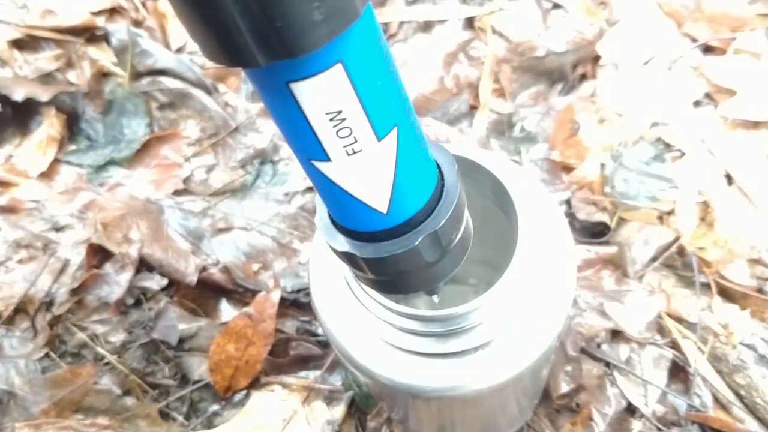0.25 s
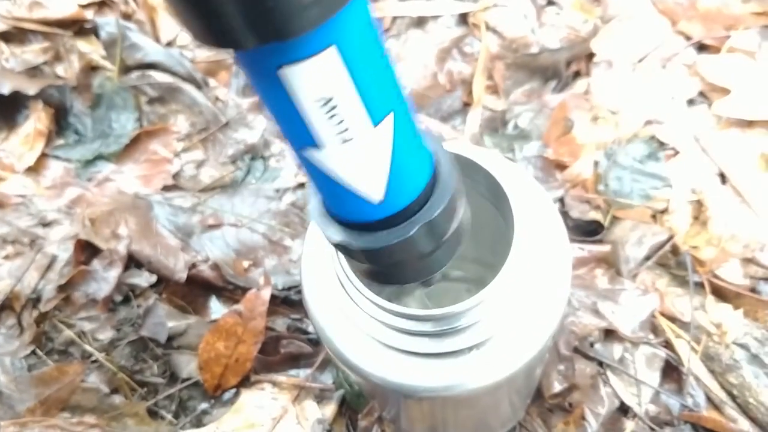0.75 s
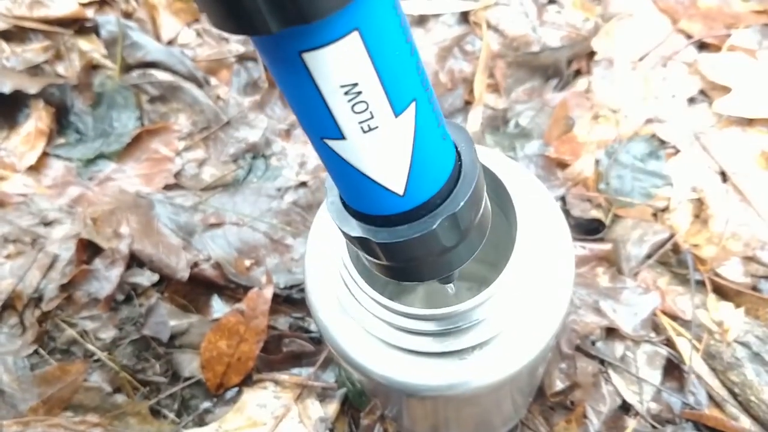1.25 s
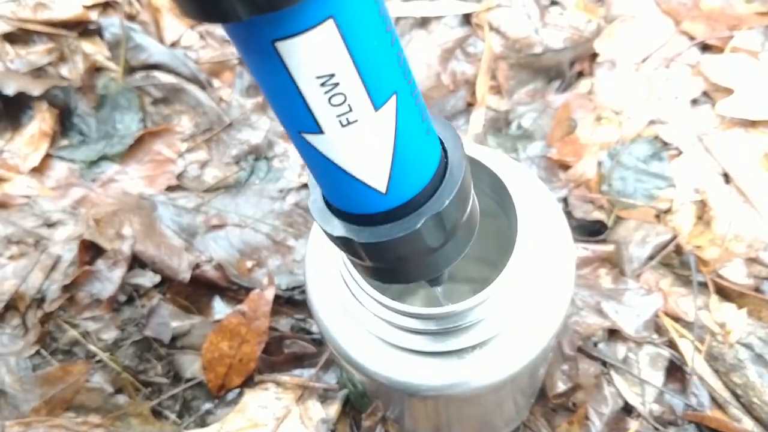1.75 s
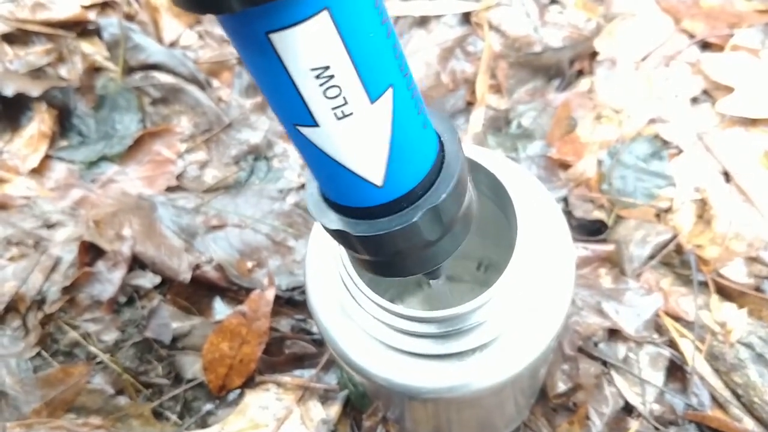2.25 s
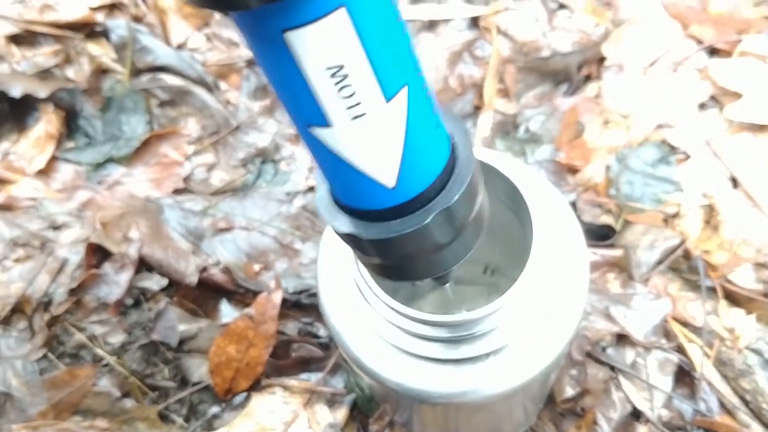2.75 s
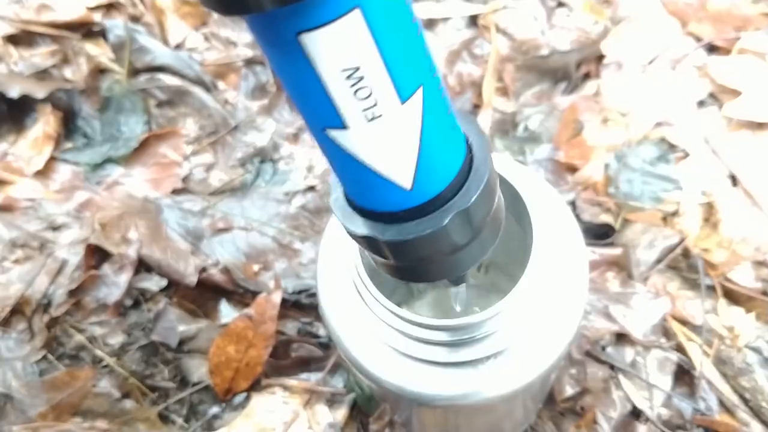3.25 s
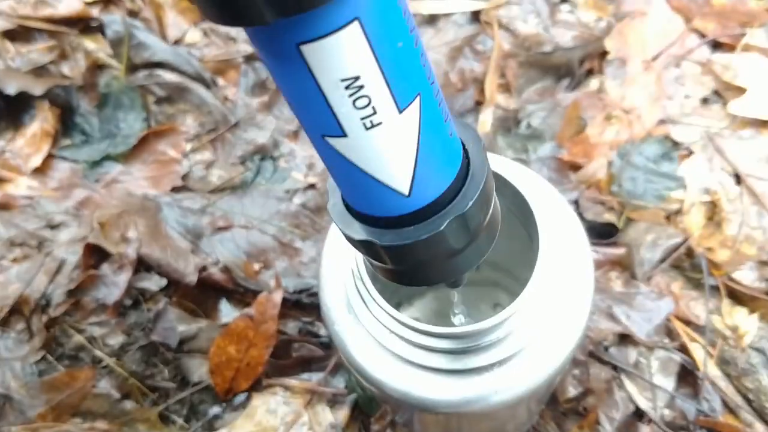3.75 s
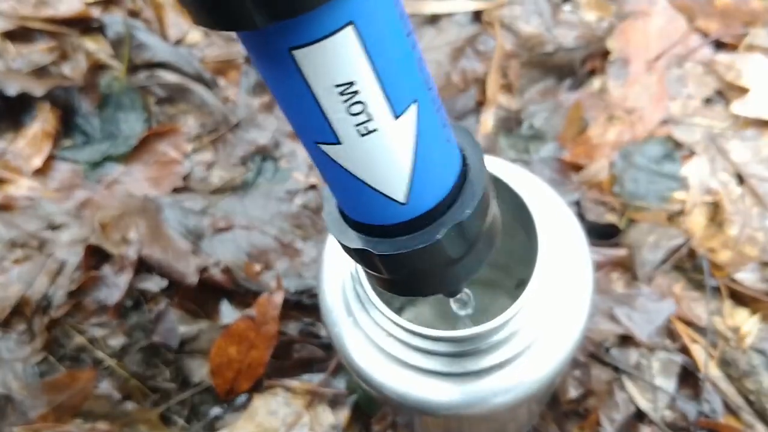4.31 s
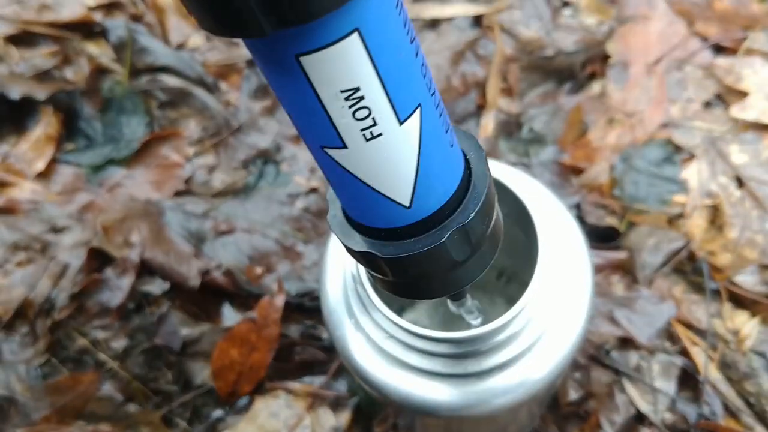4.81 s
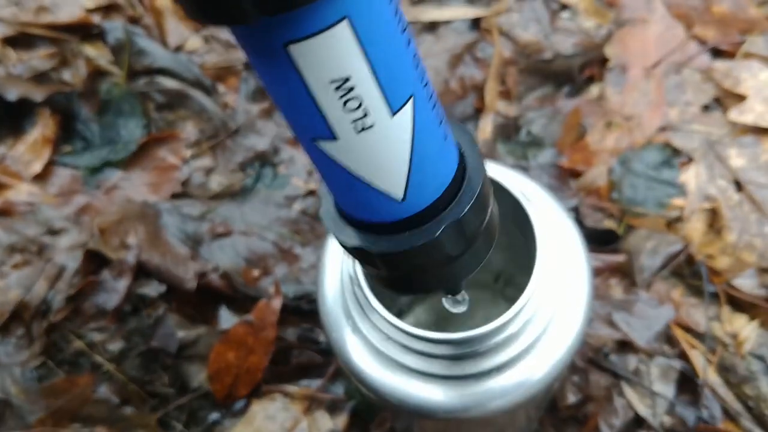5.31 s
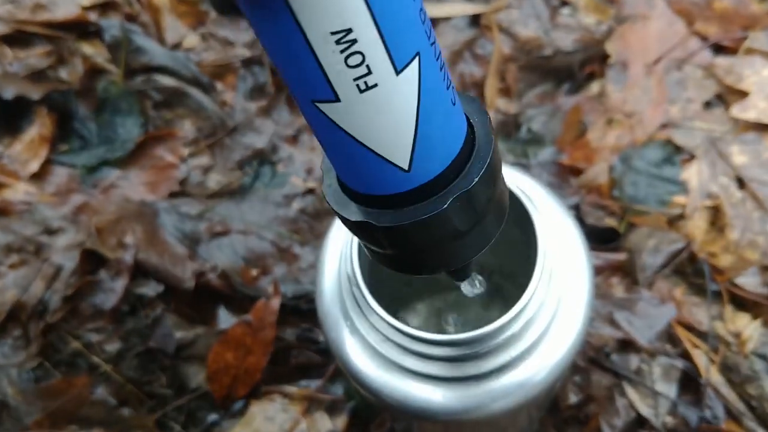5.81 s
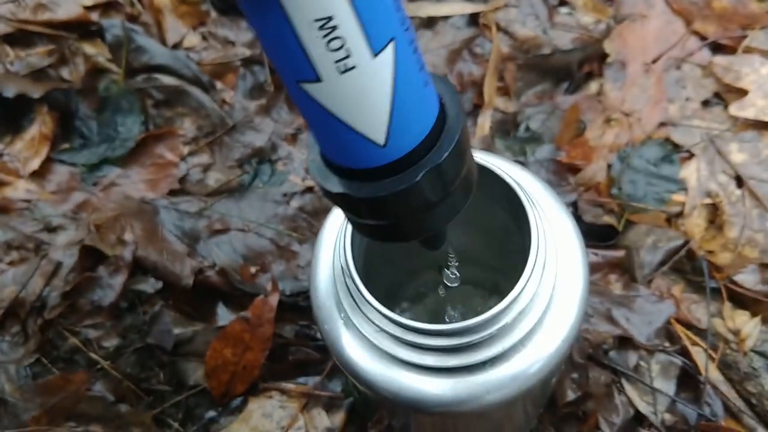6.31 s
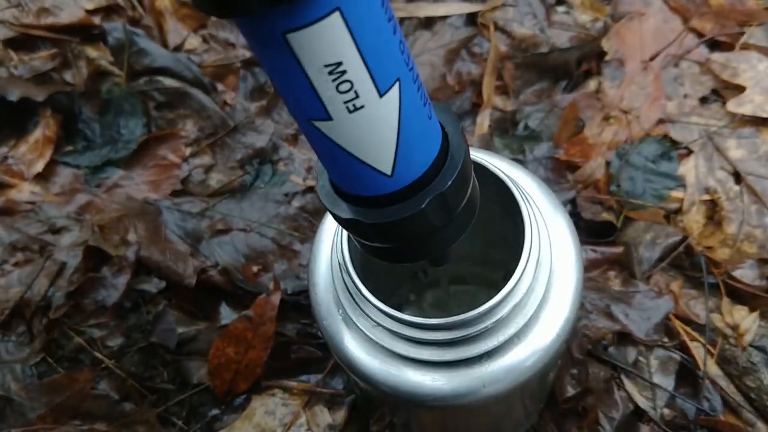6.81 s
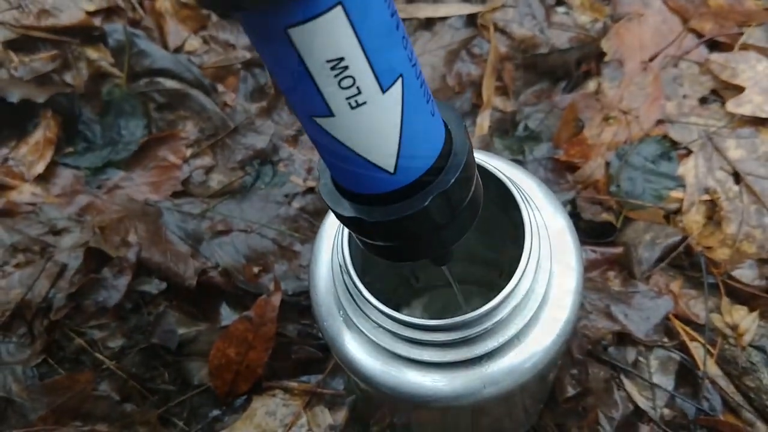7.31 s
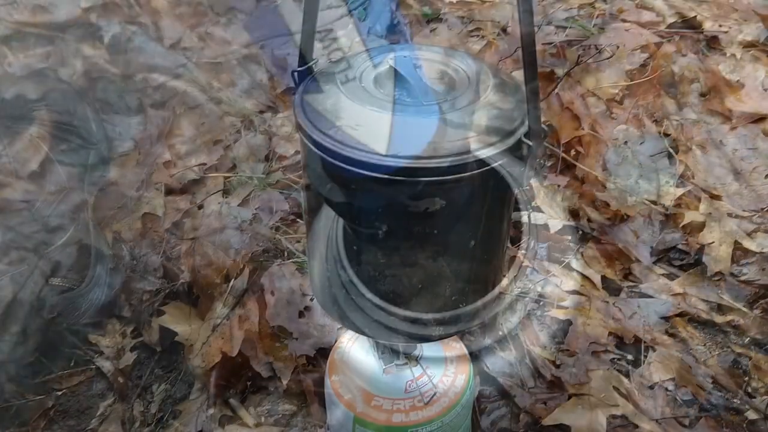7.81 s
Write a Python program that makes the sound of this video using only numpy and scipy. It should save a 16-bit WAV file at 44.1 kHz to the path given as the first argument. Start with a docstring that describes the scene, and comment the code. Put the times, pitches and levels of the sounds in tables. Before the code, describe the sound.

Irregular drops tick and spit brightly inside a metal bottle, gurgling and plinking, with the bottle's air humming low beneath. A dull distant rush surrounds it. The busy dripping calms for about two seconds, then returns. Near the end come a soft handling thump, a very short gap, and a louder low flame roar, heard close on a phone.

```python
"""Water trickling into a steel bottle, then a stove

Water trickles from a hand-held filter into a steel bottle over a broad outdoor roar. Drops splat as
filtered noise bursts, ring the bottle's air and wall as resonances and trap gliding bubble tones.
After a short silence a gas stove roars close by, as coloured noise like the outdoor roar. A phone
ducks its gain after sharp splats and widens its two microphone ports into stereo."""
import sys
import numpy as np
from scipy import signal
from scipy.fft import rfft, irfft, next_fast_len
from scipy.io import wavfile
from scipy.ndimage import uniform_filter1d

SR = 44100
rng = np.random.default_rng(int(sys.argv[2]) if len(sys.argv) > 2 else 0)


def dump(signal):
    """Clip the signal to [-1, 1] and save it as 16-bit WAV at the path in sys.argv[1]."""
    limited = np.clip(np.atleast_2d(signal).T, -1, 1)
    pcm = np.round(limited * 32767).astype(np.int16)
    wavfile.write(sys.argv[1], SR, pcm)


N = 355446
LONG = next_fast_len(N + 10)  # length of the spectra in samples

# surges of the water: top_s, hum_peak_db, air_column_pitch_hz
GUSHES = [(0.158, -31.5, 330), (0.212, -31, 309), (0.299, -27, 325.5), (0.408, -35, 311),
          (0.46, -34.5, 326), (0.597, -37.5, 311), (0.638, -36.5, 303), (0.708, -33, 316),
          (0.809, -35.5, 313), (0.852, -33, 322), (0.918, -37.5, 311), (0.974, -35.5, 333),
          (1.066, -34.5, 305), (1.103, -35, 318), (1.213, -33, 300), (1.419, -34.5, 307), (1.459, -35, 308),
          (1.946, -34.5, 321), (1.981, -34, 324), (2.132, -40, 327), (2.35, -36, 328), (2.431, -37, 310),
          (2.556, -35, 325), (2.61, -40, 340), (2.645, -31.5, 324), (2.81, -35, 310), (2.841, -35, 313),
          (2.972, -34, 302), (3.03, -40, 329), (3.06, -37.5, 316), (3.476, -35, 317), (3.527, -32, 323),
          (3.632, -31.5, 325), (4.154, -33, 296), (6.431, -32, 305), (6.473, -39, 309), (6.608, -39.5, 330),
          (6.674, -34, 323), (6.785, -42, 328), (6.828, -43, 314), (7.16, -34.5, 319), (7.401, -41, 322),
          (7.475, -37.5, 313), (7.514, -37.5, 329), (7.582, -43, 325)]
GUSH_RISE_DB_S, GUSH_FALL_DB_S = 602, 419
# gap between the water and the stove: start_s, end_s
SILENCE = (7.818, 7.871)


def undb(db):
    """Decibels to amplitude."""
    return 10 ** (np.asarray(db) / 20)


def curve(rows):
    """Second column of a table against time."""
    return np.interp(np.arange(N) / SR, *np.transpose(rows)[:2])


def across(rows, hz):
    """Second column of a table against log frequency."""
    table_hz, values = np.transpose(rows)
    return np.interp(np.log(hz + 1), np.log(table_hz), values)


def unit(x):
    """Scale to an RMS of 1."""
    return x / np.sqrt(np.mean(x ** 2))


def ring(x, hz, width):
    """One resonance, gain 1 at its centre."""
    return signal.lfilter(*signal.iirpeak(hz, hz / width, SR), x)


def walk(rate):
    """Random levels held 1 / rate s and slewed twice; spread near 1."""
    hold = int(SR / rate)
    steps = np.repeat(rng.standard_normal(N // hold + 1), hold)
    return 1.52 * uniform_filter1d(uniform_filter1d(steps, hold), hold)[:N]


def add(out, s, sound):
    """Mix a short sound in at time s."""
    i = int(s * SR)
    out[i:i + len(sound)] += sound[:N - i]


def splat(db, hz, width, tail_db):
    """A sub-millisecond crack, its echo from the bottle floor, a low slap, a hiss of spray and a thin fizz."""
    slap_hz, slap_db, slap_decay_s = 3300, -23.5, 0.0011  # mean level against the crack
    spray_decay_s, fizz_decay_s, fizz_db = 0.0067, 0.0085, -5.5  # fizz level against the spray
    t = np.arange(1800) / SR
    width = max(width, 300)
    noise = rng.standard_normal((4, len(t)))
    crack = (t == 0) + .45 * noise[0] * np.exp(-t / .00025)
    crack = crack + .4 * np.roll(crack, int(.0013 * SR))  # floor echo
    edge = width / 60000 * np.diff(crack, prepend=0)  # broad bright onset
    crack = ring(ring(crack, hz, 1.71 * width), hz, 2.17 * width) + edge
    slap_gain = undb(slap_db + 1.8 * noise[3, 0])  # varies from drop to drop
    slap = unit(ring(noise[3], slap_hz, 2200)) * np.exp(-t / slap_decay_s) * slap_gain
    spray = unit(ring(ring(noise[1], hz, width), hz, 0.56 * width)) * np.exp(-t / spray_decay_s)
    fizz = unit(ring(noise[2], hz * rng.uniform(.85, 1.1), 150)) * np.exp(-t / fizz_decay_s)
    burst = crack / abs(crack).max() + slap + undb(tail_db) * (spray + undb(fizz_db) * fizz)
    return undb(db) * burst / abs(burst).max()


def splats():
    """Loud drops burst on the surface over a random patter of faint ones."""
    # loud drops: start_s, peak_db, centre_hz, width_hz
    loud_drops = [(0.0837, -18.5, 8700, 5740), (0.086, -32, 7240, 6100), (0.1487, -28, 10100, 2700),
                  (0.1752, -34, 10700, 1800), (0.203, -36, 10000, 4600), (0.2507, -19.5, 10000, 3500),
                  (0.371, -27, 10200, 3030), (0.3934, -26, 9800, 4250), (0.435, -29.5, 10600, 2510),
                  (0.715, -23, 10800, 3500), (0.7679, -39, 10000, 3400), (0.842, -26.5, 9800, 4300),
                  (0.849, -25.5, 11200, 4050), (0.9834, -30, 10800, 2260), (1.087, -25, 7760, 1300),
                  (1.096, -30, 7400, 2500), (1.128, -28, 11000, 3400), (1.142, -19.5, 12300, 4500),
                  (1.1984, -20, 9600, 3650), (1.2131, -30, 9900, 3700), (1.286, -24, 9150, 2170),
                  (1.3376, -32, 11600, 3800), (1.3717, -28, 10600, 4700), (1.3832, -27, 8000, 4000),
                  (1.4386, -25, 10900, 2100), (1.48, -32, 10700, 4230), (1.493, -38, 10600, 3700),
                  (1.581, -18.5, 10300, 2400), (1.605, -18.5, 10800, 2200), (1.638, -25.5, 8700, 2700),
                  (1.842, -33, 10600, 3200), (1.9845, -37, 8700, 4700), (2.005, -31, 9200, 3900),
                  (2.035, -21.5, 10600, 1770), (2.048, -25, 10200, 3700), (2.0611, -39, 10500, 4500),
                  (2.199, -20, 11900, 1960), (2.319, -25, 10500, 2300), (2.4072, -30, 9200, 2800),
                  (2.4452, -27, 8600, 4660), (2.5269, -29, 10800, 2200), (2.538, -38, 8050, 2500),
                  (2.587, -33, 9900, 3900), (2.618, -37, 8200, 2500), (2.606, -22.5, 11300, 1310),
                  (2.65, -24, 10370, 1800), (2.6575, -20.5, 10000, 1500), (2.714, -22.5, 10660, 2900),
                  (2.7751, -33.5, 11400, 3700), (2.9065, -30, 12800, 4130), (2.939, -25, 8150, 1110),
                  (3.0252, -24, 10600, 2500), (3.126, -31, 9500, 3700), (3.153, -26.5, 9200, 4000),
                  (3.159, -21, 10100, 4300), (3.2433, -30, 10100, 2600), (3.281, -34, 10200, 4900),
                  (3.325, -20, 8600, 1970), (3.342, -20.5, 10200, 3530), (3.4398, -30, 11200, 3900),
                  (3.464, -31.5, 7400, 4480), (3.499, -35, 9400, 2080), (3.7038, -21, 8900, 2860),
                  (3.81, -19, 11100, 2400), (3.826, -17, 10400, 1540), (3.73, -44, 10000, 4000),
                  (3.768, -51, 9000, 1500), (3.889, -35, 10100, 5000), (3.986, -31, 9800, 5100),
                  (4.095, -18.5, 8650, 3300), (4.4471, -36.5, 8700, 2500), (5.2496, -40, 8700, 2500),
                  (5.495, -32.5, 8700, 3400), (6.432, -26, 8900, 2400), (6.481, -25, 8040, 3000),
                  (6.6128, -32, 9800, 4500), (6.651, -33, 9500, 4600), (6.8174, -31, 8400, 1800),
                  (6.824, -23.5, 13100, 3420), (6.92, -41, 8960, 2500), (6.963, -19.5, 11160, 2160),
                  (7.0318, -27.5, 9900, 2600), (7.061, -15.5, 10800, 1490), (7.1455, -28.5, 9050, 5000),
                  (7.1985, -28, 9660, 3100), (7.082, -27, 9100, 6000), (7.2506, -35.5, 8600, 3000),
                  (7.266, -36, 11000, 2500), (7.301, -35, 9100, 2500), (7.3823, -33, 10800, 3500),
                  (7.41, -32, 12900, 3195), (7.4446, -35, 9000, 3000), (7.496, -39, 8100, 1500),
                  (7.5744, -34, 8400, 4300), (7.7315, -37, 10650, 3000), (7.739, -37, 7000, 4000),
                  (7.7884, -39, 10300, 2700)]
    # density of the faint drops: time_s, drops_per_s
    patter_rate = [(0, 110), (3.9, 110), (4.3, 25), (6.3, 25), (6.5, 70), (7.8, 70)]
    # spray against the crack of a -25 dB splat; louder splats carry relatively less (dB per dB)
    spray_db, spray_slope = -14.5, 0.43
    patter_db = -45  # before the random spread in drop size
    out = np.zeros(N)
    for s, db, hz, width in loud_drops:
        add(out, s, splat(db, hz, width, spray_db - spray_slope * (db + 25)))
    for i in np.flatnonzero(rng.random(N) < curve(patter_rate) / SR):
        size, colour, width = rng.random(3)
        db = patter_db - 2.9 * np.log(size + 0.056)
        add(out, i / SR, splat(db, 6000 + 7500 * colour, 1500 + 4500 * width, -19))
    return out


def knocks():
    """A drop shakes the wall for a few ms; its modes swell, waver and fade."""
    # drops that ring the wall: time_s (the swell begins 2 ms earlier), level_db, push_ms
    wall_hits = [(0.0425, -34, 2.6), (0.204, -28, 2.3), (0.2498, -35, 3), (0.291, -37.5, 4.5),
                 (0.4663, -23.5, 4.8), (0.547, -39, 7), (0.5938, -25.5, 4.2), (0.624, -30.5, 3.2),
                 (0.697, -35, 4.6), (0.812, -37, 4.5), (0.844, -23.5, 4.2), (0.959, -32, 7.2),
                 (1.016, -38, 6), (1.0972, -29.5, 5.2), (1.133, -35, 5), (1.415, -24, 3.3),
                 (1.4544, -24, 5.1), (1.5076, -24.5, 6.1), (1.539, -35, 6.8), (1.983, -32, 2.6),
                 (2.34, -31.5, 4.7), (2.372, -30, 2.9), (2.41, -35, 4.1), (2.5413, -36, 6), (2.616, -37, 5),
                 (2.794, -17.5, 10), (2.9706, -32, 6.5), (3.078, -41, 5), (3.127, -43, 5),
                 (3.316, -36, 5.1), (3.394, -21.5, 20), (3.434, -32, 6.7), (3.617, -40, 5), (3.686, -38, 4),
                 (3.788, -43, 3.4), (6.42, -36, 6), (6.67, -42, 6), (7.2697, -28.5, 14), (7.6202, -21, 20)]
    # modes of the steel wall: pitch_hz, level_db, t60_s
    wall_modes = [(1312, 0, .1), (1385, -12, .05), (780, -16, .05)]
    out, t = np.zeros(N), np.arange(6000) / SR
    for s, db, push_ms in wall_hits:
        waver = 1 + 0.31 * np.sin(2 * np.pi * (rng.uniform(69, 96) * t + rng.random()))
        swell = 1 - np.exp(-(t * 1300 / max(push_ms, .3)) ** 1.55)
        modes = 0
        for hz, mode_db, t60 in wall_modes:
            tone = np.sin(2 * np.pi * (hz * t + rng.random()))
            modes = modes + undb(mode_db - 60 * t / t60) * tone
        add(out, s - .002, undb(db) * swell * waver * modes)
    return out


def bubble(db, hz, t60, glide):
    """A rough little splash, then a ragged tone that fades and glides as the bubble nears the surface."""
    t = np.arange(int(t60 * SR)) / SR
    noise = rng.standard_normal((2, len(t)))
    fade = undb(-60 * (t / t60) ** 1.35) * (1 - np.exp(-t / .001))
    splash = unit(ring(noise[0], 1.29 * hz, 0.56 * hz)) * np.exp(-t * hz / 11)
    pure = np.sin(2 * np.pi * hz * (t + glide * t ** 2 / t60))
    ragged = 0.23 * min(hz / 3000, 1) * unit(ring(noise[1], hz, 0.083 * hz))
    return undb(db) * (fade * (pure + ragged) + 0.3 * splash)


def bubbles():
    """The clear bubbles, each trailed by a swarm of smaller ones, over a gurgle of faint ones."""
    # clear bubbles: start_s, level_db, pitch_hz, glide (share of pitch gained by half of the t60)
    clear_bubbles = [(0.085, -32, 6000, -0.1), (0.248, -34, 2110, -0.053), (0.468, -31.5, 2760, 1.2),
                     (0.582, -48.5, 2320, 0), (0.524, -43.5, 3480, 0.47), (0.826, -41, 2940, 0.3),
                     (0.851, -45, 3400, 0.52), (1.103, -40, 2900, 0.1), (1.106, -45, 1850, -0.017),
                     (1.964, -36, 927, 0.26), (1.383, -42.5, 3100, 0.16), (2.004, -39, 2880, 0.31),
                     (2.272, -37.5, 2990, 0.34), (2.365, -43, 750, 0.47), (2.416, -34, 2470, 0.38),
                     (2.493, -35.5, 796, 0.68), (2.543, -39, 948, 0.019), (2.586, -51, 3840, 0.17),
                     (2.603, -46, 3300, -0.16), (2.625, -35, 2640, -0.086), (2.627, -34, 2160, -0.0084),
                     (2.64, -37, 800, 0.5), (2.682, -43.5, 3300, -0.024), (2.713, -46, 3800, 0.0029),
                     (2.934, -42, 770, 0.02), (3.11, -40, 1740, 0.079), (3.617, -32.5, 1040, -0.022),
                     (3.728, -34.5, 3000, 0.48), (3.894, -33.5, 3190, 0.38), (3.896, -38, 1720, 0.2),
                     (4.096, -28.5, 5320, -0.13), (4.108, -32, 2120, -0.031), (5.574, -43, 2730, 0.49),
                     (6.062, -38, 760, 0.14), (6.417, -34, 876, -0.011), (6.515, -42, 2600, 0.092),
                     (6.611, -41, 2770, -0.3), (6.612, -32.5, 2214, 0.049), (6.654, -33, 1500, 0),
                     (6.668, -34, 786, 1.05), (6.716, -36, 1900, 0.11), (6.791, -38, 794, -0.059),
                     (6.833, -36.5, 2730, 0.12), (6.92, -36, 2590, 0.096), (6.973, -46, 3700, -0.19),
                     (7.266, -38, 3370, 0.035), (7.272, -39, 568, -0.0000091), (7.582, -38, 2270, 0.1)]
    t60_at_1khz_s, burst = 0.081, 1.9  # higher bubbles fade sooner; gliding ones burst sooner
    swarm_db, swarm_s = -16, .04  # level against the clear bubble, longest lag
    gurgle_db, gurgles_per_s = -47.5, 150  # level before the spread in pitch and size
    out = np.zeros(N)
    for s, db, hz, glide in clear_bubbles:
        t60 = t60_at_1khz_s * np.sqrt(1000 / hz) / (1 + burst * abs(glide))
        add(out, s, bubble(db, hz, t60, glide))
        for late, pitch, bend in rng.random((3, 3)):
            near_hz = hz * (.8 + .7 * pitch)
            small = bubble(db + swarm_db - 6 * late, near_hz, 35 / near_hz, 0.38 * bend)
            add(out, s + swarm_s * late, small)
    for i in np.flatnonzero(rng.random(N) < gurgles_per_s / SR):
        size, pitch, glide = rng.random(3)
        hz = 600 * 7 ** pitch
        db = gurgle_db - 7 * pitch - 3.0 * np.log(size + 0.037)
        add(out, i / SR, bubble(db, hz, (25 + 40 * glide) / hz, .5 * glide ** 2))
    return out


def gushes():
    """Each gush makes the air column hum for a moment, bending slightly upward."""
    out, t = np.zeros(N), np.arange(-2000, 5000) / SR  # t = 0 at the top of the gush
    drop_db = np.maximum(-GUSH_RISE_DB_S * t, GUSH_FALL_DB_S * t)
    swell = undb(3 - np.sqrt(drop_db ** 2 + 9))  # rounded at the top
    for s, db, hz in GUSHES:
        hum = np.sin(2 * np.pi * (hz * (t + 0.36 * t ** 2) + rng.random()))
        add(out, s + t[0], undb(db) * swell * hum)
    return out


def flow_db():
    """Steady flow with a quick rise and a slower fall around every gush."""
    steady_db, froth_db = -48.5, -10.5  # froth of a gush against its hum
    t = np.arange(0, N, 64) / SR
    s, db = np.transpose(GUSHES)[:2, :, None]
    gush_db = db + froth_db - np.maximum(GUSH_RISE_DB_S * (s - t), GUSH_FALL_DB_S * (t - s))
    power = undb(2 * gush_db).sum(axis=0) + undb(2 * steady_db)
    return np.interp(np.arange(N) / SR, t, 10 * np.log10(power))


def stream():
    """Dense uneven droplet blows drum the air column in the bottle."""
    # air resonances: pitch_hz, width_hz (a second pass is three times as wide), relative level_db
    air_modes = [(308, 19.6, 5.5), (331.6, 18.3, 8.5), (1326.5, 29, -6.5), (1465, 57, -8.5),
                 (3310, 330, -11)]
    hits = rng.random(N) < 500 / SR  # 500 blows per second on average
    blows = hits * rng.standard_normal(N) * undb(1.8 * rng.exponential(size=N))
    drummed = 0
    for hz, width, db in air_modes:
        drummed = drummed + undb(db) * unit(ring(ring(blows, hz, width), hz, 3 * width))
    return unit(drummed) * undb(flow_db())


def bump():
    """A finger knocks the phone: a dull single thump that sags in pitch; returns its start in s and sound."""
    # the knock: start_s, peak_db, starting pitch_hz, t60_s
    start_s, db, hz, t60 = (7.6535, -21, 150, .035)
    t = np.arange(int(t60 * SR)) / SR
    fade = undb(db - 60 * (t / t60) ** 1.35)
    return start_s, fade * np.sin(2 * np.pi * hz * (t - .4 * t ** 2 / t60))


def rush(spectrum, flicker_db, grain_db):
    """Two unrelated coloured noises; neighbouring bands flicker together, each half octave has quick grain."""
    hz, out = np.fft.rfftfreq(LONG, 1 / SR), 0
    noise = rfft(rng.standard_normal((2, LONG))) * undb(across(spectrum, hz))
    slow = [walk(12) for _ in range(10)]  # one per pair of bands
    half_octaves = 2 * np.log2(np.clip(hz, 32, 16384) / 32)
    for k in range(19):
        share = np.clip(1 - abs(half_octaves - k), 0, 1)  # overlapping triangular bands
        level_db = flicker_db * slow[k // 2] + grain_db * min(k / 12, 1) * walk(45)
        out = out + irfft(noise * share)[:, :N] * undb(level_db)
    return unit(out)


def stove():
    """A gas flame's turbulent roar as flickering coloured noise that builds up unevenly."""
    # colour of the flame: pitch_hz, relative level_db per Hz
    flame_colour = [(40, -22), (90, -10.5), (150, 2), (250, 0), (500, -9), (800, -20.5), (1300, -11),
                    (2100, -31), (2800, -20.5), (4300, -39), (6000, -28), (8000, -26.5), (11000, -32),
                    (12500, -24.5), (15000, -46)]
    # loudness of the flame: time_s, level_db
    flame_level = [(7.871, -45), (7.89, -40.5), (7.93, -35), (7.99, -28), (8.025, -33), (8.06, -28.5)]
    return rush(flame_colour, 1.6, 2.3) * undb(curve(flame_level))


def outdoor_roar():
    """A broad distant roar as steady coloured noise with a slight flicker."""
    # colour of the roar: pitch_hz, relative level_db per Hz
    roar_colour = [(38, -16.5), (62, -6), (100, -1), (160, 3), (300, 1.5), (480, -4), (780, -7.5),
                   (1020, -16.5), (1400, -6), (2000, -16), (2700, -12), (4000, -28), (6000, -26.5),
                   (9000, -25), (12000, -26.5), (15000, -30.5)]
    return rush(roar_colour, 1.16, 1.85) * undb(-40.5)


def scene():
    """Two ports: the water reaches both alike, the roar and the stove only partly."""
    # how alike the roar and the stove are at the two ports: pitch_hz, likeness (0-1)
    port_likeness = [(40, .7), (300, .9), (450, .6), (620, 0), (900, .3), (1300, .6), (4000, .2),
                     (15000, 0)]
    t = np.arange(N) / SR
    before = np.clip((SILENCE[0] - t) / .004, 0, 1)  # 4 ms fade into the silence
    after = t > SILENCE[1]
    near = (splats() + knocks() + bubbles() + gushes() + stream()) * before
    partly = outdoor_roar() * before + stove() * after
    hz = np.fft.rfftfreq(LONG, 1 / SR)
    alike = np.clip(across(port_likeness, hz), 0, 1)
    first, other = rfft(partly, LONG)
    second = irfft(alike * first + np.sqrt(1 - alike ** 2) * other)[:N]
    ports = near + np.array([partly[0], second])
    add(ports[1], *bump())  # the knock lands on one port only
    return ports


def gain_control(dry):
    """Treble peaks over a ceiling pull the water's gain down, a few ms late, and it climbs back steadily."""
    ceiling_db, climb_db_s, start_db, grab_s = -26.5, 12, -6.5, 0.005
    hiss_db, hiss_from_hz = -65.5, 1500  # white noise level before its band filter
    t = np.arange(N) / SR
    treble_filter = signal.butter(2, 3000, "high", fs=SR, output="sos")
    treble = abs(signal.sosfilt(treble_filter, dry[0]))
    over_db = 20 * np.log10(treble + 1e-9) - ceiling_db
    over_db[0] = -start_db  # the gain starts out pulled down
    climb_db = climb_db_s * t
    cut_db = np.clip(np.maximum.accumulate(over_db + climb_db) - climb_db, 0, None)
    late_db = np.interp(t - grab_s, t, uniform_filter1d(cut_db, int(grab_s * SR)))
    ducked = dry * undb(-late_db * (t < SILENCE[1]))  # the stove plays at full gain
    # the phone's own hiss lies under the water only, and the gain control does not reach it
    hiss_filter = signal.butter(1, [hiss_from_hz, 12000], "band", fs=SR, output="sos")
    hiss = signal.sosfilt(hiss_filter, rng.standard_normal(dry.shape))
    return ducked + undb(hiss_db) * hiss * (t < SILENCE[0])


def record(dry):
    """One port feeds the sum, the other the difference; the phase between left and right combs both."""
    # phase by which right leads left, close to a plain delay above 1 kHz: pitch_hz, lead_half_turns
    right_lead = [(40, .76), (90, .67), (170, .51), (300, .49), (480, .6), (700, .35), (1130, 0), (2500, 1),
                  (5000, 3), (6250, 4), (7350, 5), (9550, 7), (12000, 9), (16600, 13)]
    # unequal ports keep the notches from closing fully: pitch_hz, leak_share (0-1)
    port_leak = [(2500, 0.07), (5000, 0), (9000, 0.1), (12000, 0.13)]
    # balance before the leak correction: pitch_hz, left_minus_right_db
    balance = [(40, 4), (200, 3.5), (330, 0), (500, -6), (900, -3), (1200, 0), (2300, -1.5), (5000, 0),
               (8000, 4.5), (10500, -1), (12000, -3), (14000, 0)]
    notch_narrow = 0.77  # under 1: thinner notches between flatter lobes
    hz = np.fft.rfftfreq(LONG, 1 / SR)
    half = np.interp(hz, *np.transpose(right_lead)) * np.pi / 2  # half the lead, in radians
    first, second = rfft(gain_control(dry), LONG)
    cos, sin = (np.sign(v) * abs(v) ** notch_narrow for v in (np.cos(half), np.sin(half)))
    leak = across(port_leak, hz)
    mid = first * (cos + 1j * leak * sin)
    side = second * (-1j * sin - leak * cos)
    tilt = undb(across(balance, hz) / 2) * (1 + .8 * leak)  # the leak alone would favour the right
    wide = irfft(np.array([(mid + side) * tilt, (mid - side) / tilt]))[:, :N]
    # the capsules drop deep bass
    wide = signal.sosfilt(signal.butter(2, 50, "high", fs=SR, output="sos"), wide)
    # steep top limit at 15480 Hz
    return signal.sosfilt(signal.ellip(12, .2, 70, 15480, fs=SR, output="sos"), wide)


dry = scene()
out = record(dry)
dump(out)
```